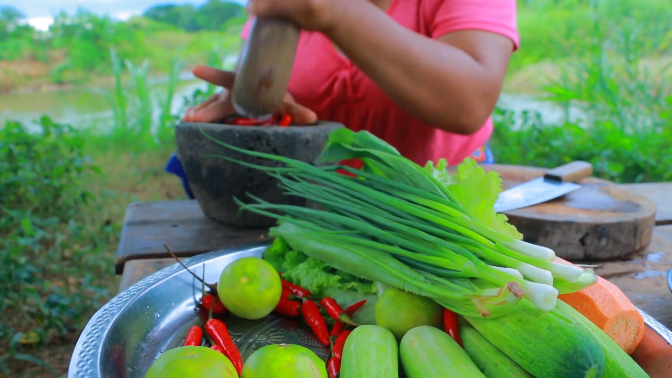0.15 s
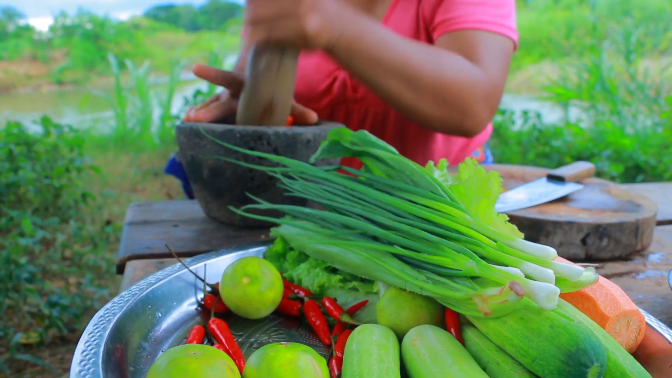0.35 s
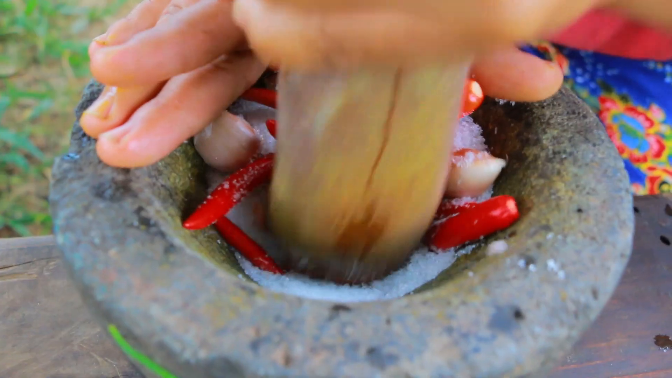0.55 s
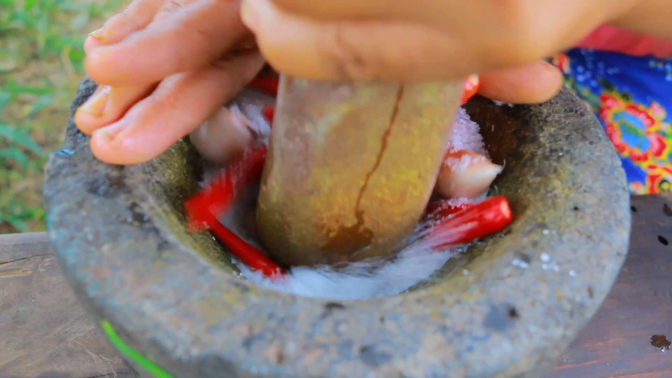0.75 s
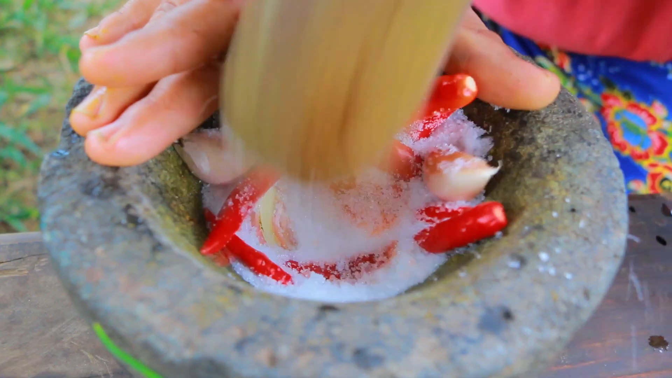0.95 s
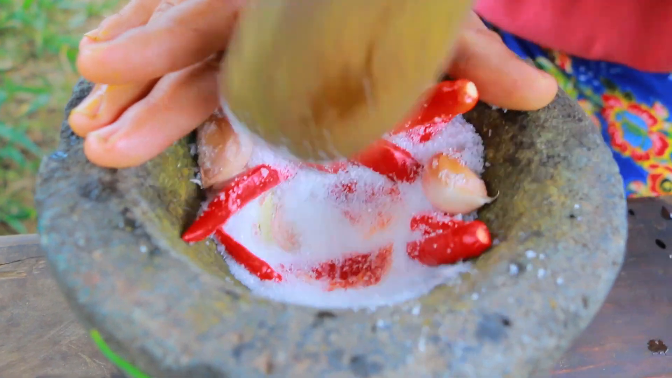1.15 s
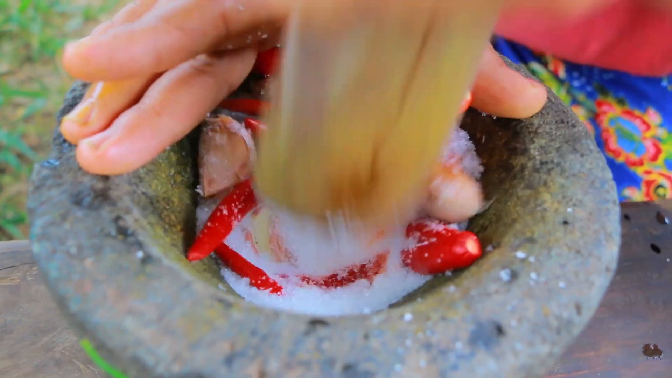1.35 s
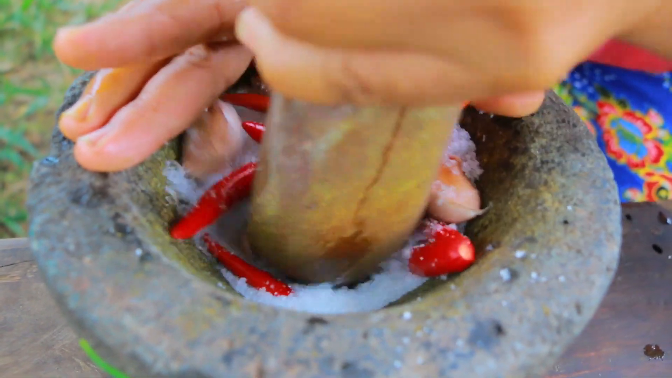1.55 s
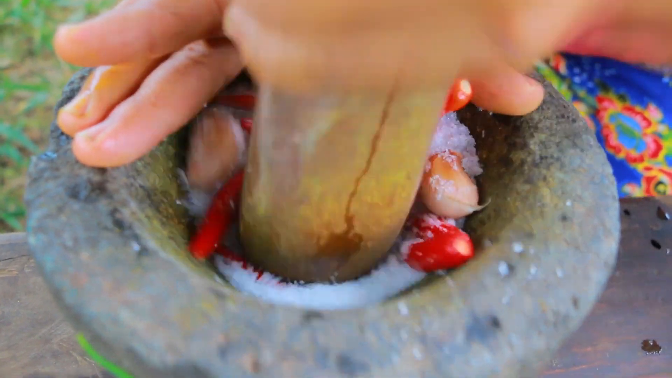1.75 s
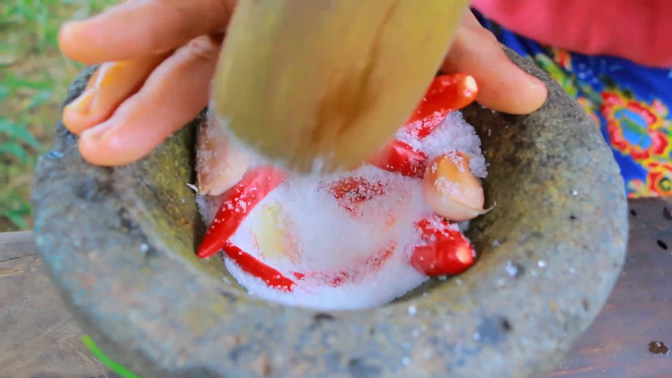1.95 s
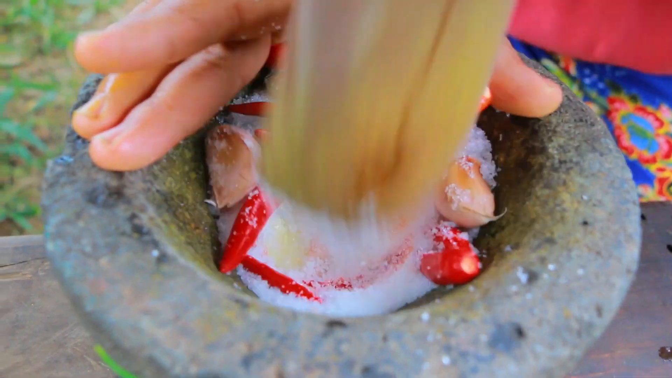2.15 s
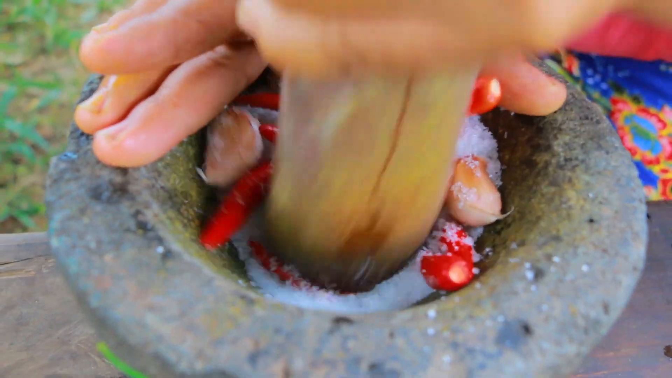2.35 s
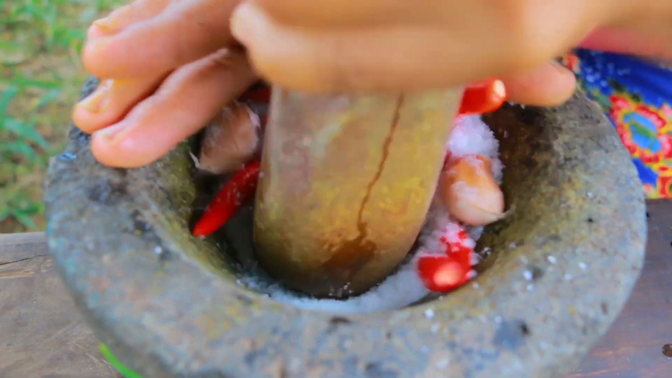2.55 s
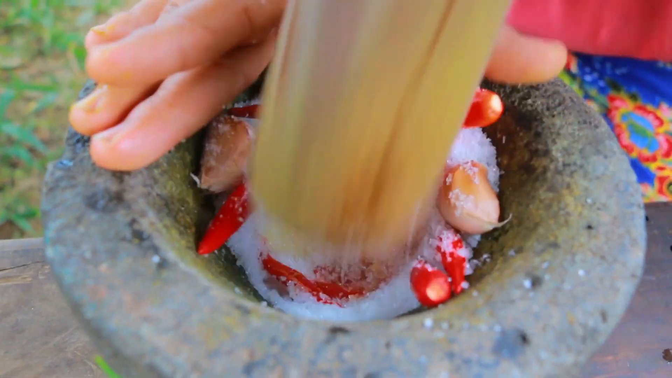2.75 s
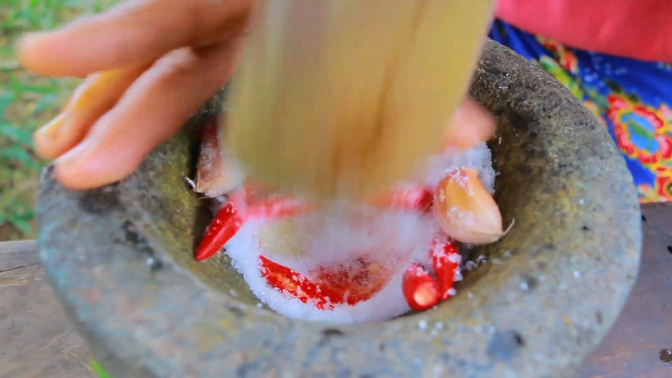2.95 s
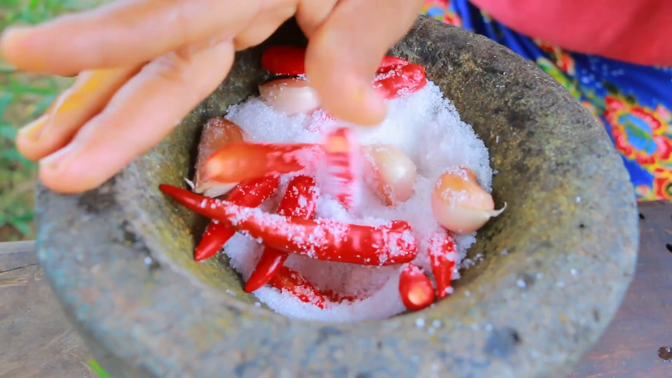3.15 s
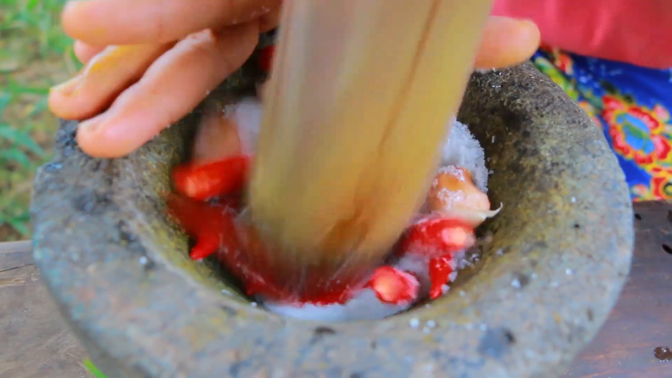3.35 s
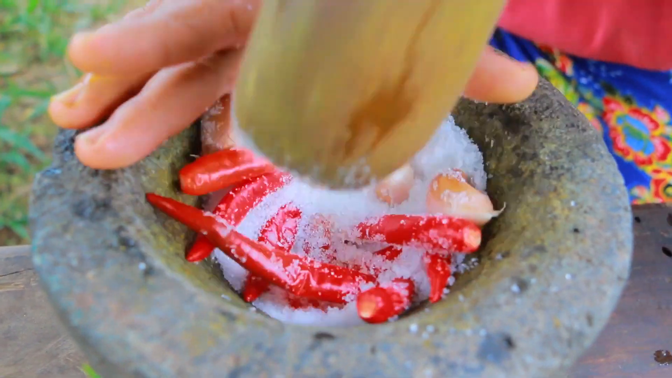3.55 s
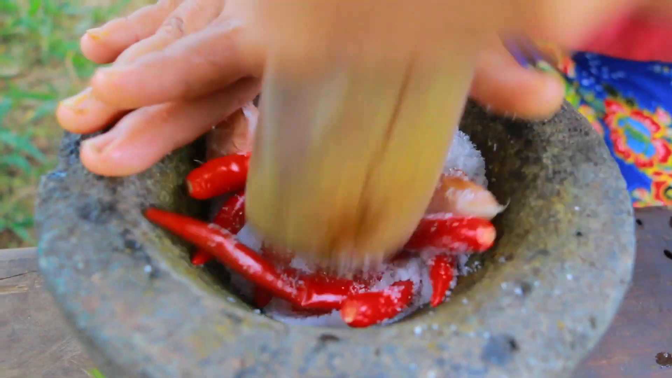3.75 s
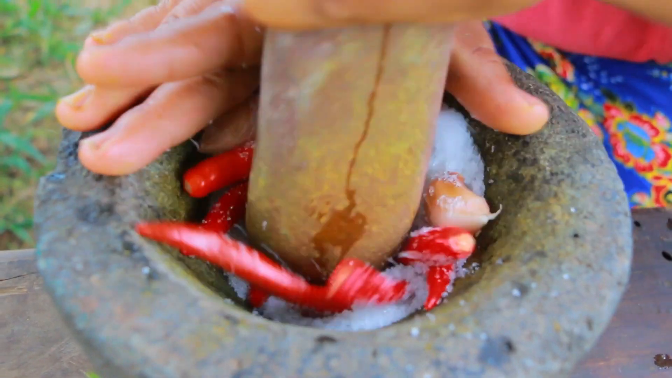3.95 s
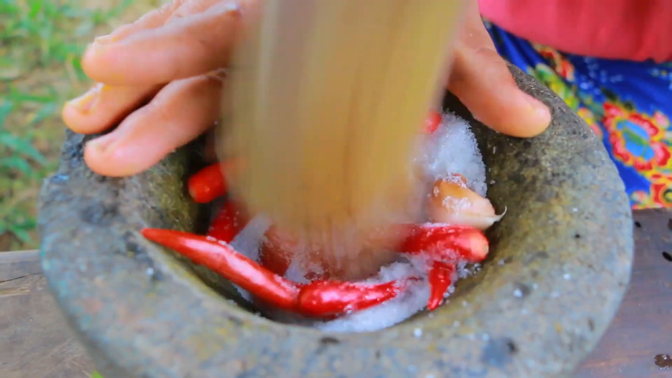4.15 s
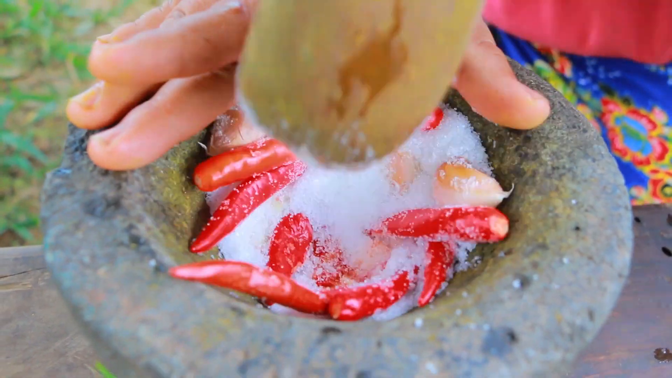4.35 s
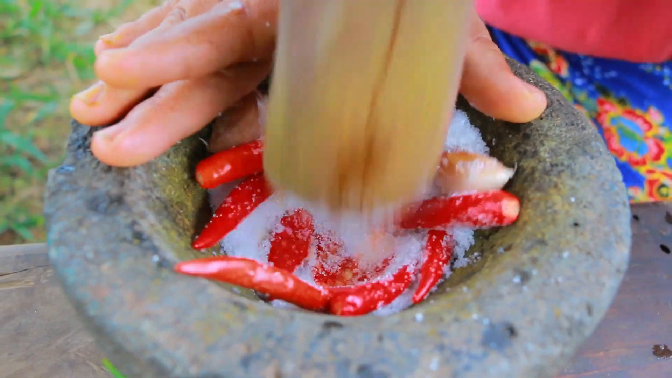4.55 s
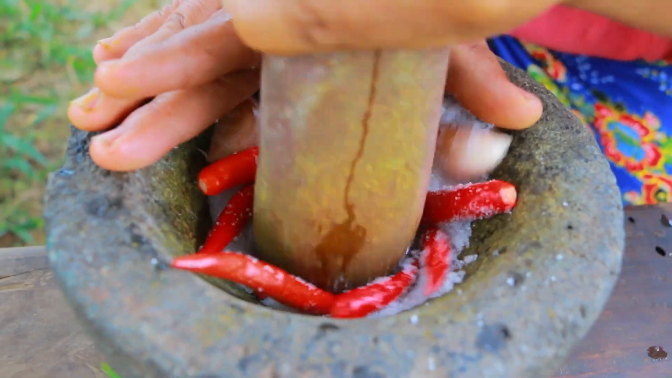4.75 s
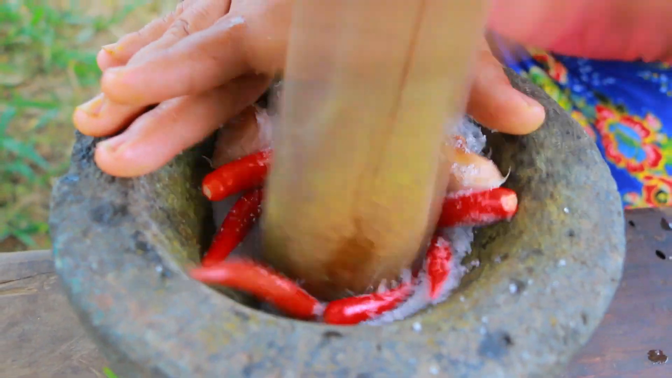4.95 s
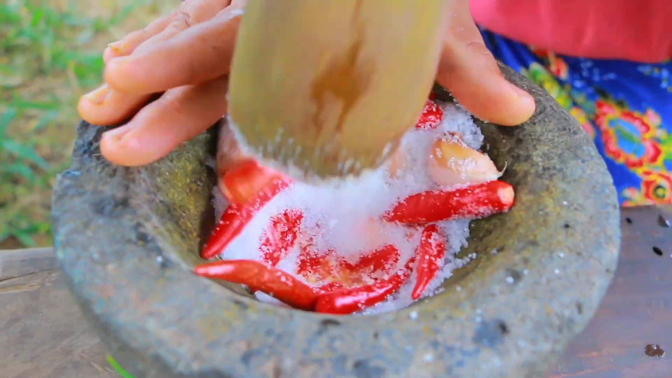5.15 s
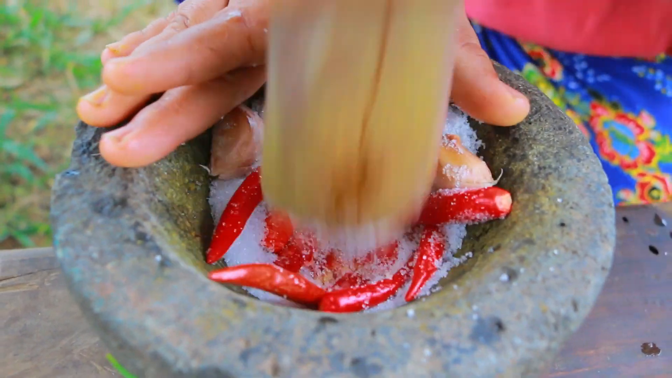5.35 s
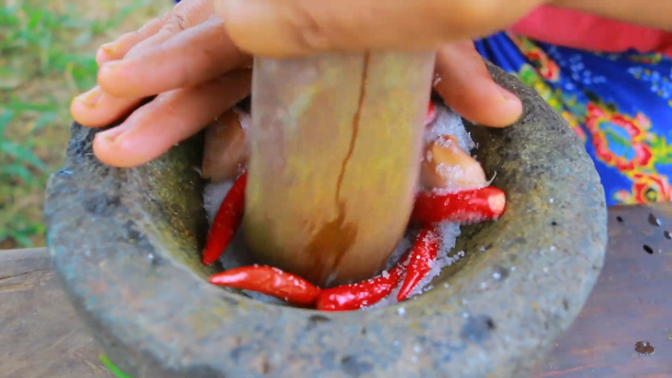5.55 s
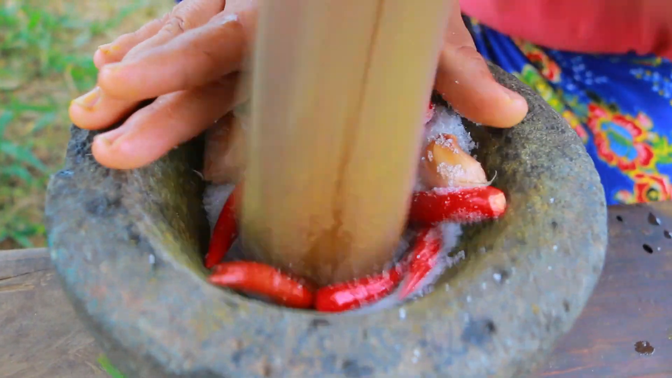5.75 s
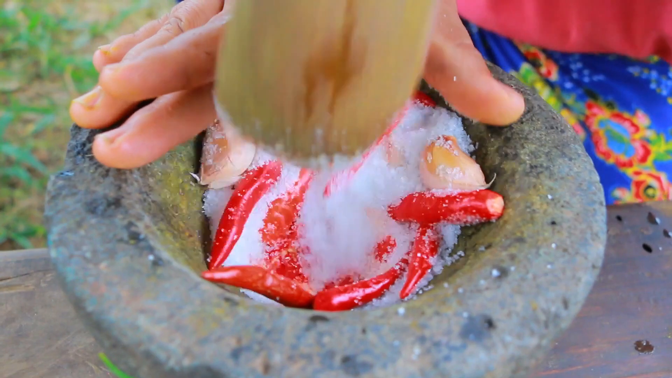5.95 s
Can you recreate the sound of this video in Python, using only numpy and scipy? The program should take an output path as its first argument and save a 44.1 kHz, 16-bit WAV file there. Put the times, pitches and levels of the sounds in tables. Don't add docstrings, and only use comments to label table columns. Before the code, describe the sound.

Very close stereo pounding of a wooden pestle in a stone mortar on a plank table outdoors. Quick steady blows, nearly four a second, each a short salt crunch, a low table thump and a hard stony knock, with crumbs settling afterwards. Mortar and planks bounce between blows; a knife and board tick on the right. A tiny silence falls near the start, and one blow is skipped midway. Faint crickets and wind behind.

```python
import sys
import numpy as np
from scipy import signal
from scipy.io import wavfile

SR = 44100
rng = np.random.default_rng(int(sys.argv[2]) if len(sys.argv) > 2 else 0)


def magnitude_from_level(level_db):
    exponent = np.asarray(level_db, float) / 20
    return 10 ** exponent


def store_pcm(level_fs):
    pcm = np.round(np.clip(level_fs, -1, 1) * 32767).astype(np.int16)
    wavfile.write(sys.argv[1], SR, np.atleast_2d(pcm).T)


N = 265482


def column(rows, k):
    return np.array(rows, float)[:, k]


def at_hz(points, hz):
    return np.interp(np.log(hz), np.log(column(points, 0)), column(points, 1))


def drift(rate_hz):
    r = np.exp(-80 * np.pi * rate_hz / SR)
    slow = signal.lfilter([1], [1, -2 * r, r * r], rng.standard_normal(N // 40 + 2002))[2000:]
    return np.interp(np.arange(N) / 40, np.arange(len(slow)), slow / slow.std())


def band_pass(x, low_hz, high_hz):
    sos = signal.butter(2, [low_hz, min(high_hz, .45 * SR)], "band", fs=SR, output="sos")
    return signal.sosfilt(sos, x)


# pitch_hz, likeness (1 = same)
PORT_LIKENESS = [(60, 1), (180, 0.93), (550, 0.96), (1650, 0.51), (4970, 0.12), (15000, -1.2)]


def banded(spectrum, white, gain_db):
    out = 0
    edges = 25 * 2 ** np.arange(0, 9.6, .5)
    for k, (low, high) in enumerate(zip(edges, edges[1:])):
        hz = np.sqrt(low * high)
        if hz < spectrum[0][0]:
            continue
        sos = signal.butter(2, [low, high], "band", fs=SR, output="sos")
        mid, side = signal.sosfilt(sos, white[k % 2])
        alike = np.clip(at_hz(PORT_LIKENESS, hz), 0, .99)
        stereo = np.sqrt(1 + alike) * mid + np.sqrt(1 - alike) * side * [[1], [-1]]
        out = out + magnitude_from_level(at_hz(spectrum, hz) + gain_db(hz)) * stereo
    return out


# start_s, table_pitch_ratio, mortar_pitch_ratio, debris_db
SEATINGS = [(.07, 1.15, 0.96, -33.5), (.32, 1.27, 1.07, -41), (.55, 1.02, 0.98, -30), (.8, 0.96, 0.95, -30),
            (1.06, 0.98, 0.98, -29.5), (1.31, 1.06, 0.92, -26.5), (1.57, 0.91, 0.99, -34),
            (1.825, 1.015, 1.015, -28.5), (2.08, 0.92, 0.93, -28.5), (2.345, 0.97, 0.97, -20.5),
            (2.605, 0.94, 0.94, -25), (2.855, 1, 0.98, -28), (3.44, 0.98, 1.01, -34),
            (3.7, 1.015, 0.95, -23), (3.981, 1.01, .99, -23.5), (4.24, 0.96, 0.96, -23.5),
            (4.495, 1.025, 0.99, -30), (4.77, 0.98, 1.056, -49), (5.03, 0.91, 1.01, -27),
            (5.3, 0.99, 0.97, -28), (5.575, 0.99, 1.017, -23), (5.84, 0.99, 1, -21)]


def loose_ratios():
    return 1 + .02 * np.sin(2.4 * np.arange(len(SEATINGS)))


def reseated(x, hz, t60, ratios):
    r = magnitude_from_level(-60 / (t60 * SR))
    state = np.zeros((2, 2))
    edges = np.r_[0, (column(SEATINGS, 0)[1:] * SR).astype(int), N]
    out = np.zeros((2, N))
    for i, j, ratio in zip(edges, edges[1:], ratios):
        w = 2 * np.pi * hz * np.clip(ratio, .8, 1.2) / SR
        feedback = [1, -2 * r * np.cos(w), r * r]
        out[:, i:j], state = signal.lfilter([0, np.sin(w)], feedback, x[:, i:j] + 1e-18, zi=state)
    return out


def struck(events, modes, bright_db, split_hz, shudder_db, shudder_s, per_s, wide, left_db, spread_s, ratios,
           flat=False, uneven_db=3):
    first = (column(events, 0) * SR).astype(int)
    uneven = rng.standard_normal((len(first), len(modes), 3))
    facing = rng.standard_normal((len(modes), 2))
    chatter = (rng.random(N) < per_s / SR) * rng.standard_normal((2, N)) * magnitude_from_level(shudder_db)
    out = np.zeros((2, N))
    for k, (hz, level_db, t60) in enumerate(modes):
        clicks = np.zeros(N)
        delay = (spread_s * SR * abs(uneven[:, k, 2])).astype(int)
        at = np.minimum(first + delay, N - 1)
        lift_db = bright_db * (hz > split_hz)
        clicks[at] = magnitude_from_level(column(events, 1) + level_db + uneven_db * uneven[:, k, 0] + lift_db)

        fade_s = shudder_s * (.6 if hz > split_hz else 1)
        dying = signal.lfilter([1], [1, -magnitude_from_level(-60 / (fade_s * SR))], clicks)
        clicks[at] *= 1 if flat else np.sign(uneven[:, k, 1])

        apart = np.clip(wide * hz / (hz + 1500), 0, 1)
        late = dying * (chatter[k % 2] + apart * chatter[1 - k % 2] * [[1], [-1]])
        ring = reseated(clicks + late, hz, t60, ratios)
        ring[0] = np.roll(ring[0], int(abs(facing[k, 1]) * apart * SR / hz / 4))
        out += ring * magnitude_from_level(np.array([[.5], [-.5]]) * (left_db + apart * facing[k, 0]))
    return out


# start_s, end_s
SILENCE_S = (.4535, .5315)
# pitch_hz, level_db per Hz
HUSH_SPECTRUM = [(50, -11), (75, -29), (120, -10.5), (350, -13), (1200, -22), (3000, -30.5), (7000, -35.5),
                 (15000, -51.5)]
# start_s, level_db
HUSH_LEVEL = [
    (0, -39.5),
    (.4, -40.5),
    (.6, -46.5),
    (2.05, -43.5),
    (3.1, -44.5),
    (3.55, -41),
    (6.02, -43.5),
]
# top_s, swell_s, level_db
CRICKET_PHRASES = [
    (0.03, .2, -56),
    (.3, 0.18, -51.5),
    (.72, 0.12, -59.5),
    (2.05, .12, -59.5),
    (2.24, 0.18, -58),
    (3.53, 0.37, -53),
    (4.72, 0.23, -59),
    (6.02, 0.29, -58),
]


def field():
    t = np.arange(N) / SR
    before = t < SILENCE_S[0]
    airy_db = 0.5
    hush = banded(HUSH_SPECTRUM, rng.standard_normal((2, 2, N)),
                  lambda hz: 1.5 * drift(8) + airy_db * (hz > 7000) * before)
    hush_db = np.interp(t, column(HUSH_LEVEL, 0), column(HUSH_LEVEL, 1))
    out = magnitude_from_level(hush_db) * hush / hush.std()

    swell_db, break_db_per_s = 11, 138
    phrases_db = [db - np.maximum(swell_db * (top - t) / swell, break_db_per_s * (t - top))
                  for top, swell, db in CRICKET_PHRASES]
    high_db = np.max(phrases_db, axis=0)
    pulse = np.sin(2 * np.pi * np.cumsum(16 + 0.88 * drift(5.1)) / SR)
    trill = magnitude_from_level(4.2 * (t > SILENCE_S[0]) * pulse)
    high_gain = magnitude_from_level(high_db) * trill
    low_gain = magnitude_from_level(.5 * high_db - 26) * before
    for hz, width, gain in ((6370, 410, high_gain), (4560, 380, low_gain)):
        band = band_pass(rng.standard_normal((2, N)), hz - width / 2, hz + width / 2)
        band = band_pass(band, hz - width, hz + width)
        out += gain * magnitude_from_level(3.7 * drift(7.5)) * band / band.std() * magnitude_from_level([[-1.5], [1.5]])
    return out


def wind():
    t = np.arange(N) / SR
    wind_db, gust_db = -49.5, 15.5
    gust_s, rise_s, fall_s = 3.42, 0.065, 0.24
    puffs = band_pass(rng.standard_normal(N) + 0.26 * rng.standard_normal((2, N)), 31, 96)
    gust = np.clip(1 - np.maximum((gust_s - t) / rise_s, (t - gust_s) / fall_s), 0, 1)
    level_db = wind_db + gust_db * gust + 2.0 * drift(40) + np.array([[2.5], [-2.5]])
    return magnitude_from_level(level_db) * puffs / puffs.std()


# start_s, length_ms, level_db, top_db (above 7 kHz)
CRUNCHES = [(0.061, 11, -28, -14.5), (0.315, 16, -26, -19.5), (0.544, 13.4, -27.5, -13.5),
            (0.782, 21.6, -27, -14), (1.043, 20.6, -26, -11.5), (1.3, 20.7, -25.5, -12.5),
            (1.561, 15, -26, -12.5), (1.822, 7.9, -24.5, -11.5), (2.076, 11.4, -23.5, -8.5),
            (2.347, 4.8, -14.5, -13), (2.607, 7.8, -20.5, -8), (2.862, 1.1, -22.5, -10),
            (3.408, 29, -36.5, -9), (3.429, 23.4, -28.5, -11), (3.704, 7.3, -21.5, -15),
            (3.976, 13, -21, -15), (4.239, 19.6, -20, -17.5), (4.5, 3.7, -16, -16.5),
            (4.767, 7.3, -20.5, -14), (5.029, 6.7, -20, -12.5), (5.292, 12, -30, -21.5),
            (5.576, 5.4, -17, -15.5), (5.84, 5.6, -14.5, -19)]
# pitch_hz, level_db per Hz
SALT_SPECTRUM = [(300, -5.5), (1000, -2.5), (2500, -8.5), (5000, -11), (9000, -13), (15000, -27.5)]


def grit(rattles):
    level, top_db = np.full(N, 1e-9), np.zeros(N)
    t = np.arange(N) / SR
    for s, ms, db, top in CRUNCHES:
        i = max(int((s - .03) * SR), 0)
        span = slice(i, i + SR // 10)
        near, end = t[span], s + ms / 1000
        sinking_db = 13.0 * np.clip((end - near) / (end - s), 0, 1) ** 0.6
        sinking_db = sinking_db + np.clip((s - near) / 0.00024, 0, 99)
        settling = magnitude_from_level(-(near - end) / 0.0002) + magnitude_from_level(-18.0 - (near - end) / 0.0019)
        level[span] += magnitude_from_level(db + 9.5 - sinking_db) * np.minimum(settling, 1)
        top_db[span] = top + 9

    at = (column(rattles, 0) * SR).astype(int)
    spray = np.zeros(N)
    spray[at] = magnitude_from_level(column(rattles, 1) + 2.5)
    spray = signal.lfilter([1], [1, -magnitude_from_level(-60 / (0.025 * SR))], spray)
    latest = np.clip(np.searchsorted(at, np.arange(N), "right") - 1, 0, None)
    loose = spray / (spray + level)
    top_db = top_db + loose * (column(rattles, 2)[latest] + 4 - top_db)

    snaps = magnitude_from_level(4.39 * np.minimum(rng.exponential(1, N), 4))
    grains = rng.standard_normal((2, 2, N)) * snaps * (level + spray)
    grains[:, 1] *= .55

    def tilt_db(hz):
        return top_db * np.clip(np.log2(hz / 3500), 0, 1) - 5 * loose * max(np.log2(2500 / hz), 0)

    return banded(SALT_SPECTRUM, grains, tilt_db) * magnitude_from_level((1.2 + 3 * loose) * [[-1], [1]])


# start_s, push_db, knock_delay_ms, brightness_db, knock_db
BLOWS = [(.081, -9, -0.05, -0.5, -5.5), (.33, -11, -0.65, 1.5, -4), (.557, -1, 13, 0.5, -3),
         (.813, -8.5, 1.05, -3, -4), (1.073, -13, 5, 4.5, -6.5), (1.32, -2.5, 12, -2.5, -2.5),
         (1.585, -7, 1.1, -3.5, -3), (1.83, -5.5, 7.5, -2, -9.5), (2.095, -12, 1, 1, -2),
         (2.357, -5, 3.5, -11, -1.5), (2.613, -3.5, 13, -6, -1.5), (2.864, -4.5, 14.5, -4, -4.5),
         (3.713, 0, 4, -2.5, -6), (3.996, -0.5, 3, -1.5, -8.5), (4.25, -12.5, 4.5, -11.5, -6),
         (4.504, -0.5, 7.5, -3.5, -2), (4.778, -9, 6.5, 3, -4), (5.048, -1.5, -0.05, -0.5, -4.5),
         (5.319, -5, 0.9, 1, -6), (5.582, -1, 7, -5.5, -3), (5.848, -5.5, 8.5, -2.5, -1.5)]
# start_s, push_db, knock_db
ROCKS = [(0.246, -37.5, -37.5), (1.0634, -4, -17.5), (1.1094, -23, -20), (1.184, -25.5, -33),
         (1.268, -31, -33), (2.269, -25.5, -38), (2.35, -22, -41), (3.023, -26, -32.5), (3.049, -29, -29),
         (3.1224, -33.5, -37), (3.46, -15.5, -23), (3.478, -10.5, -21.5), (3.545, -30, -30.5),
         (3.886, -28, -31), (4.146, -19, -21), (4.182, -23, -26), (4.445, -23.5, -28), (4.539, -14, -18),
         (5.036, -24, -19), (5.166, -22, -26.5), (5.196, -22.5, -23), (5.5, -25, -25), (5.61, -8, -11.5),
         (5.782, -28.5, -33), (5.877, -12, -11)]
# start_s, push_db
SWINGS = [(0.121, -13), (0.134, -30), (.428, -22.5), (0.632, -10), (.877, -8), (1.126, -23), (1.148, -23),
          (1.383, -7.5), (1.652, -11.5), (1.672, -26), (1.903, -13), (2.185, -14.5), (2.418, -10.5),
          (2.468, -14.5), (2.658, -11), (2.699, -29), (2.93, -13.5), (3.775, -6.5), (4.048, -9),
          (4.344, -20), (4.557, -17), (4.573, -13), (4.822, -9.5), (4.847, -24), (5.098, -16), (5.118, -13),
          (5.389, -14), (5.639, -13), (5.92, -9), (5.962, -13.5)]
# start_s, push_db
NUDGES = [(0.068, -27), (0.32, -16.5), (0.799, -18.5), (1.504, -34), (1.574, -17.5), (2.085, -6),
          (2.319, -29.5), (2.381, -7.5), (2.892, -8), (2.977, -23), (3.602, -30.5), (3.984, -25),
          (4.273, -1.5), (4.403, -23), (4.683, -26.5), (4.928, -24.5), (4.973, -22.5), (5.31, -12),
          (5.473, -22)]
# pitch_hz, level_db, t60_s
TABLE_MODES = [(100, -27, 0.08), (159.2, -13.5, 0.16), (216.2, -4.5, 0.13), (237.5, -3.5, 0.14),
               (271.4, 2, 0.065), (307.3, -2.5, 0.12), (343, -6.5, 0.14), (408.8, -8.5, 0.13),
               (70.5, 2, 0.034)]


def table_thumps():
    pushes = [row[:2] for row in BLOWS + SWINGS + ROCKS + NUDGES]
    thumps = struck(pushes, TABLE_MODES, bright_db=0, split_hz=9999, shudder_db=-2.57, shudder_s=0.14, per_s=250,
                    wide=0.23, left_db=0.86, spread_s=0, ratios=column(SEATINGS, 1), flat=True)
    return band_pass(magnitude_from_level(-6.5) * thumps, 120.7, 1200)


# pitch_hz, level_db
DEBRIS_SPECTRUM = [(500, -8), (900, -4.5), (1500, -2), (2300, -3.5), (3500, -8), (5000, -23)]


def debris():
    t = np.arange(N) / SR
    grains_per_s, ring_cycles, rise_s, fall_db_per_s = 2300, 37, 0.014, 168.5
    level = sum(magnitude_from_level(db - fall_db_per_s * np.maximum(t - s, 0)) * np.clip((t - s) / rise_s, 0, 1)
                for s, _, _, db in SEATINGS)
    grains = (rng.random(N) < grains_per_s / SR) * rng.standard_normal(N)
    grains = grains * magnitude_from_level(1.9 * np.minimum(rng.exponential(1, N), 4))
    pitches = np.geomspace(500, 5000, num=16)
    dealt = rng.integers(0, high=16, size=N)
    clumps = magnitude_from_level(1.9 * drift(45))
    out = np.zeros((2, N))
    for k, hz in enumerate(pitches):
        r, w = magnitude_from_level(-60 * hz / (ring_cycles * SR)), 2 * np.pi * hz / SR
        hits = grains * (dealt == k) * level * clumps
        ring = signal.lfilter([0, np.sin(w)], [1, -2 * r * np.cos(w), r * r], hits + 1e-18)
        out += magnitude_from_level(at_hz(DEBRIS_SPECTRUM, hz) + np.array([[-1], [1]]) * rng.normal(1.2, 2.0)) * ring
    return out


# start_s, knock_db, brightness_db
REBOUNDS = [(0.1335, -14.5, 5.5), (0.3782, -22, 7.5), (.4274, -23, 1.5), (0.862, -12.5, -1.5),
            (0.8837, -22.5, -25), (1.37, -13, -3.5), (1.3945, -22, 1), (1.6499, -19.5, -11),
            (1.8821, -27, 7), (1.9061, -19, -2), (2.1522, -20.5, -9), (2.407, -11, -7), (2.4183, -13, -4),
            (2.4669, -23.5, -3), (2.6717, -13, -1), (2.6816, -19, -22), (2.9285, -20.5, 5),
            (3.7812, -13.5, -2.5), (4.0383, -7, -4.5), (4.097, -18.5, -1.5), (4.3105, -19, 1.5),
            (4.3225, -32, 11), (4.5689, -19, 8.5), (4.829, -18.5, -28), (4.8433, -22, 7.5),
            (4.903, -32, -9), (5.1003, -16.5, -1), (5.1188, -21, -11), (5.6563, -16.5, 5.5),
            (5.9242, -15.5, 5.5)]
# start_s, knock_db
TAPS = [(.1766, -48), (.5629, -13.5), (.6096, -18.5), (.6851, -35), (1.8426, -2.5), (2.813, -30),
        (2.8637, -15), (3.724, -6.5), (3.826, -29), (4.262, -8), (5.3371, -17), (5.3579, -14),
        (5.5976, -9.5), (5.746, -28.5), (5.9598, -26)]
# pitch_hz, level_db, t60_s
MORTAR_MODES = [(446, 4, 0.0074), (547.7, -3, 0.073), (671.4, 4.5, 0.029), (749, 3.5, 0.046),
                (754, -10.5, 0.12), (849, 3.5, 0.016), (985, 5, 0.027), (1170, -8.5, 0.0074),
                (1300, -6, 0.026), (1593, -9.5, 0.023), (1686, -17.5, 0.052), (2050, -2.5, 0.009),
                (2473, -20.5, 0.045), (2990, -7.5, 0.0032)]


def mortar_knocks():
    blows = [(s + ms / 1000, db, bright) for s, _, ms, bright, db in BLOWS]
    rock_bright_db, dulling = -5, 0.34
    soft = [(row[0], row[-1], rock_bright_db + dulling * (row[-1] + 15)) for row in ROCKS + TAPS]
    knocks = blows + REBOUNDS + soft
    ringing = struck(knocks, MORTAR_MODES, bright_db=column(knocks, 2) + 8, split_hz=1200, shudder_db=-11.5,
                     shudder_s=0.16, per_s=500, wide=0.95, left_db=-0.85, spread_s=0.001798,
                     ratios=column(SEATINGS, 2))
    return band_pass(magnitude_from_level(-4.5) * ringing, 218, 5400)


# start_s, peak_db
CRACKS = [(.0815, -6), (.332, 9), (1.0645, -12), (1.3225, -6), (1.8437, -7), (2.4075, -24), (2.4183, -18),
          (2.6265, -10), (3.7105, -15), (4.0382, -20), (4.0505, -9), (4.2625, -7), (4.5035, -15),
          (4.786, -10), (5.0505, -9), (5.3095, 3.5)]


def cracks():
    clicks = np.zeros(N)
    clicks[(column(CRACKS, 0) * SR).astype(int)] = -magnitude_from_level(column(CRACKS, 1) + 8.5)
    pulse = band_pass(clicks, 550, 3800)
    return np.array([magnitude_from_level(-5.0) * np.roll(pulse, shift=3), pulse])


# start_s, level_db
BOARD_TICKS = [(0.1327, -14), (0.385, -28), (0.625, -25), (1.0788, -14.5), (1.217, -36), (1.3867, -23),
               (1.9496, -34), (2.216, -26.5), (2.497, -27), (2.68, -22), (2.885, -23), (2.928, -25),
               (2.967, -33), (3.723, -11), (3.771, -20), (4.271, -15.5), (4.52, -14.5), (4.576, -27),
               (4.9342, -24.5), (4.9704, -28.5), (5.1905, -23), (5.243, -34.5), (5.3085, -7.5),
               (5.3871, -22), (5.9746, -19.5)]
# start_s, handle_db, tip_db, tip_metal_db
SEESAWS = [
    (0.4242, -20, -21, -7),
    (1.6388, -33, -30.5, -5),
    (4.305, -16.5, -20, 3),
    (4.84, -16.5, -50, 16.5),
    (4.9026, -14.5, -44, 14),
    (4.988, -21.5, -29, -2.5),
    (5.049, -18.5, -38, 10),
    (5.156, -22, -24.5, -3),
    (5.624, -24.5, -27, -2),
]
# start_s, level_db
KNIFE_HOPS = [(0.571, -22), (0.676, -27.5), (0.818, -26.5), (0.855, -32), (0.8744, -22), (0.8924, -27),
              (1.3377, -21), (2.1045, -16), (2.1521, -24), (2.164, -31), (2.3637, -22), (2.434, -23.5),
              (2.45, -32), (2.7113, -25), (2.9157, -24), (3.7872, -25), (3.8191, -18), (3.999, -27),
              (4.044, -23.5), (4.088, -22.5), (4.128, -31), (5.119, -25), (5.328, -17.5), (5.366, -21),
              (5.609, -24), (5.6548, -19), (5.683, -27), (5.8613, -19.5), (5.918, -18), (6.011, -17)]
# start_s, level_db
TIP_GLINTS = [
    (2.529, -44.5),
    (2.6311, -22.5),
    (4.4048, -43),
    (4.584, -46),
    (5.3215, -38),
    (5.6011, -19),
    (5.6435, -35),
    (5.897, -38),
]


def rattle_contacts():
    hops = [(s, db, -2.5) for s, db in KNIFE_HOPS]
    board = [(s, db, -14.5) for s, db in BOARD_TICKS]
    glints = [(s, db, 6.5) for s, db in TIP_GLINTS]
    handles = [(s, db, -9.5) for s, db, _, _ in SEESAWS]
    tip_delay_s = 0.0076
    tips = [(s + tip_delay_s, db, metal) for s, _, db, metal in SEESAWS]
    return sorted(hops + board + glints + handles + tips)


# pitch_hz, level_db, t60_s
BOARD_MODES = [(2020, -0.5, 0.022), (2680, -2.5, 0.014), (2958, -3, 0.028), (3324, -7, 0.028),
               (3693, -8, 0.019), (4290, -15, 0.064), (5010, -21, 0.037)]
# pitch_hz, level_db, t60_s
BLADE_MODES = [(5990, -22.5, 0.058), (6920, -6.5, .035), (8100, -3.5, 0.061), (9340, -2.5, 0.039),
               (10200, -10, 0.023), (11700, -17, 0.029), (12650, -14, .055), (13560, -9, 0.041),
               (15500, -19, .04)]


def knife_and_board(rattles):
    tick = struck(rattles, BOARD_MODES, bright_db=0, split_hz=9999, shudder_db=-7.5, shudder_s=0.059, per_s=2200,
                  wide=0.98, left_db=-3.5, spread_s=.001, ratios=loose_ratios())
    blade = struck(rattles, BLADE_MODES, bright_db=column(rattles, 2), split_hz=100, shudder_db=-10.5,
                   shudder_s=.025, per_s=2500, wide=0.43, left_db=-10.5, spread_s=.0001,
                   ratios=loose_ratios() ** .1)
    return band_pass(magnitude_from_level(-6.5) * (tick + blade), 670, 13000)


# start_s, level_db, upper_modes_db
CLATTER = [(.6, -32, -8), (.655, -31, -1), (.735, -32.5, -20), (.9, -24, -3.5), (1.1, -24, -7),
           (1.15, -33, 5), (1.221, -34, 2.5), (1.247, -27, -12), (1.41, -33, 4), (1.68, -31, 0),
           (1.737, -29, -2), (1.865, -28, -8), (1.93, -26.5, -0.5), (2.03, -29, -7.5), (2.146, -9.5, -6),
           (2.213, -27, -3), (2.44, -16.5, 5), (2.527, -36, 2), (2.581, -48, -12), (2.841, -24, -14),
           (2.95, -25, -6), (3.275, -45, 3.5), (3.32, -47, -10), (3.349, -56, -6), (3.46, -22.5, -10),
           (3.5, -34, -12), (3.648, -31.5, -6), (3.75, -11, -4), (3.904, -40, 6.5), (4.065, -28, -5),
           (4.11, -26, 1), (4.333, -11, -12), (4.396, -30, -8), (4.687, -32, 1), (4.805, -16, 1),
           (4.865, -35, 2), (4.914, -24, -2), (4.94, -35, 4.5), (5, -26, 0.5), (5.075, -20.5, 0),
           (5.14, -33, -9), (5.241, -29, -4), (5.42, -32, -3), (5.69, -19, -13), (5.984, -21, -3)]
# pitch_hz, level_db, t60_s
PLANK_MODES = [(264, 5, 0.046), (314, -4.5, 0.12), (425, -6.5, 0.046), (553, -10.5, 0.23), (641, 4, 0.074),
               (726, -1, 0.17), (810, -15, 0.025), (944, -9, 0.066), (1032, -8, 0.067)]


def plank_clatter():
    planks = struck(CLATTER, PLANK_MODES, bright_db=column(CLATTER, 2), split_hz=480, shudder_db=-5,
                    shudder_s=0.027, per_s=430, wide=0.65, left_db=.3, spread_s=0.003005,
                    ratios=column(SEATINGS, 2))
    return band_pass(magnitude_from_level(-3.0) * planks, 144, 2900)


# start_s, level_db, upper_modes_db
CLINKS = [(.678, -27, 0), (.885, -33, 0), (1.1204, -20.5, -7), (1.157, -28.5, -6), (1.2151, -29, -8),
          (1.4, -30, 5), (1.4561, -40, -4), (1.6392, -22, -8), (1.865, -28, -2), (1.8996, -28, -4),
          (1.9255, -26, 1), (1.943, -24.5, -4), (2, -33.5, -5), (2.1335, -20, -2), (2.2144, -28, -9),
          (2.235, -35, 4), (2.45, -39, -4), (2.8075, -39, 1), (4.11, -16, -8), (4.15, -29, -4),
          (4.35, -33, 7), (4.3799, -28.5, -1), (4.7296, -33, 0), (4.815, -22, -12), (4.996, -24, 2),
          (5.0878, -25, -4), (5.1118, -17.5, -10), (5.135, -33, 6), (5.7394, -32.5, -1)]


def board_clinks():
    clinks = struck(CLINKS, BOARD_MODES, bright_db=column(CLINKS, 2), split_hz=3100, shudder_db=-4, shudder_s=0.038,
                    per_s=900, wide=1.0, left_db=-7, spread_s=0.0023, ratios=loose_ratios(), uneven_db=4.5)
    return band_pass(magnitude_from_level(-8.5) * clinks, 1200, 8000)


# start_s, level_db
SHIVERS = [
    (4.565, -40),
    (4.797, -46),
    (5.394, -42.5),
    (5.631, -31),
]


def blade_shivers():
    return struck(SHIVERS, BLADE_MODES, bright_db=0, split_hz=0, shudder_db=-7, shudder_s=.015, per_s=2500,
                  wide=.4, left_db=-8, spread_s=0, ratios=loose_ratios() ** .1)


def scene():
    rattles = rattle_contacts()
    around = field() + wind() + grit(rattles)
    close = table_thumps() + mortar_knocks() + knife_and_board(rattles)
    close[0, 2:] = close[0, :-2].copy()
    bowl = debris() + cracks()
    return around + close + bowl + plank_clatter() + board_clinks() + blade_shivers()


def roll_off(x):
    return signal.sosfilt(signal.butter(12, 15900, fs=SR, output="sos"), x)


def record(dry):
    t = np.arange(N) / SR
    over_db = np.maximum(20 * np.log10(np.abs(dry).max(0) + 1e-9) + 14, 0)
    held_db = np.maximum.accumulate(over_db + 120 * t) - 120 * t
    gain = magnitude_from_level(-.4 * signal.lfilter([.004], [1, -.996], held_db))
    on = np.clip(np.maximum(SILENCE_S[0] - t, t - SILENCE_S[1]) / .001, 0, 1)
    mix = np.clip(dry * gain, -1, 1) * on
    return roll_off(mix)


dry = scene()
out = record(dry)
store_pcm(out)
```